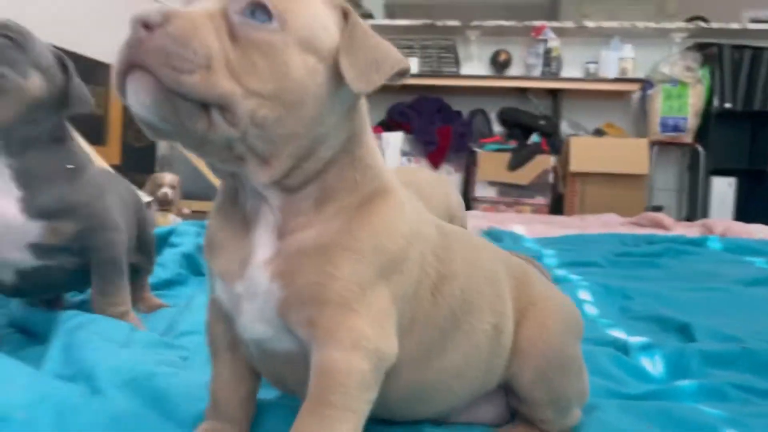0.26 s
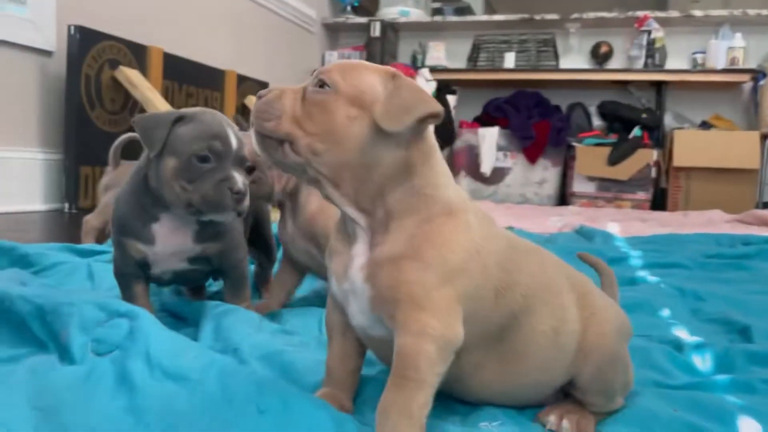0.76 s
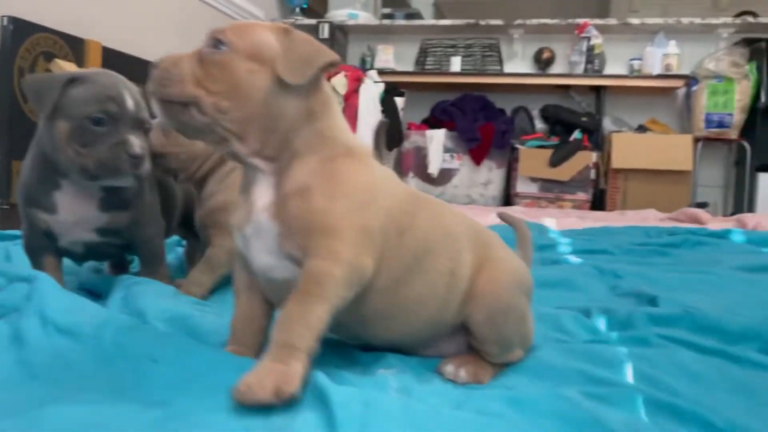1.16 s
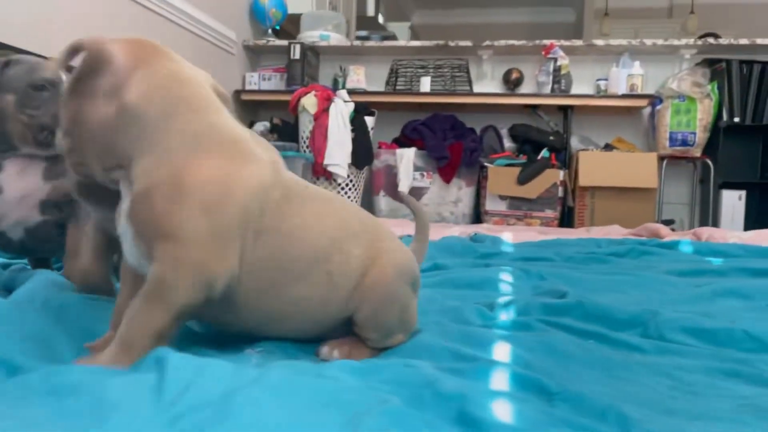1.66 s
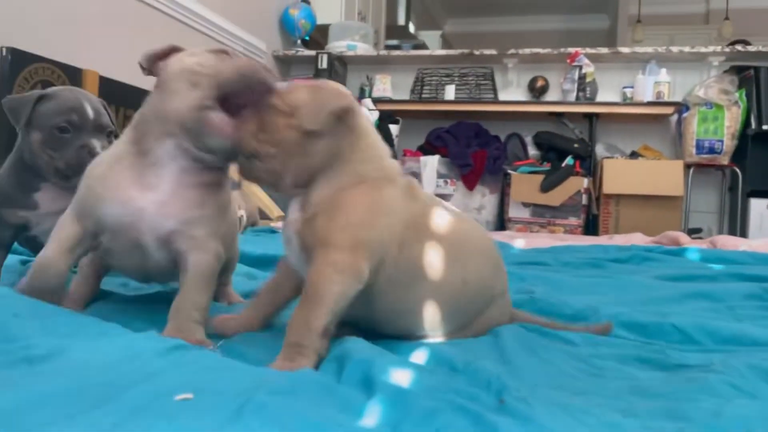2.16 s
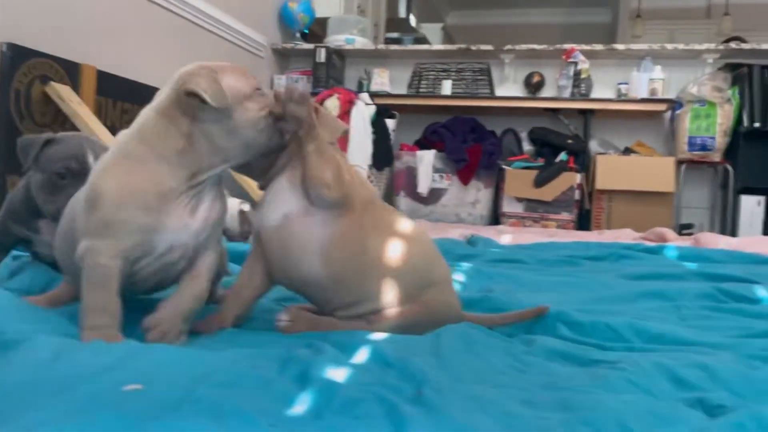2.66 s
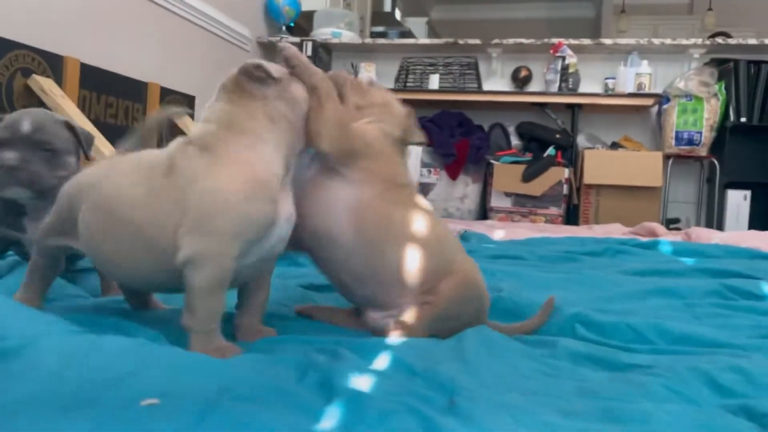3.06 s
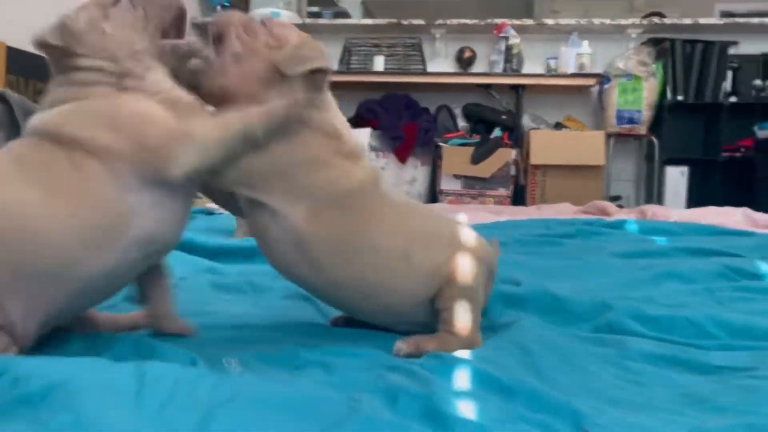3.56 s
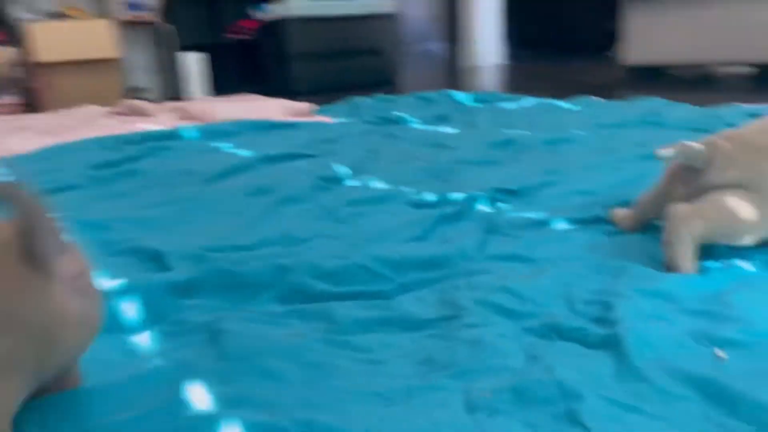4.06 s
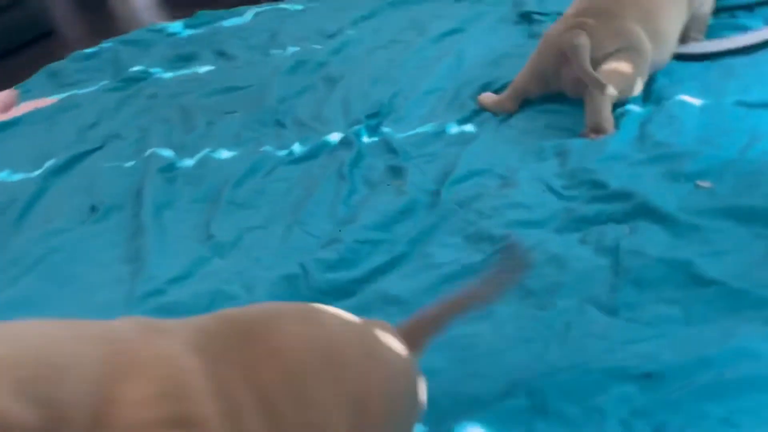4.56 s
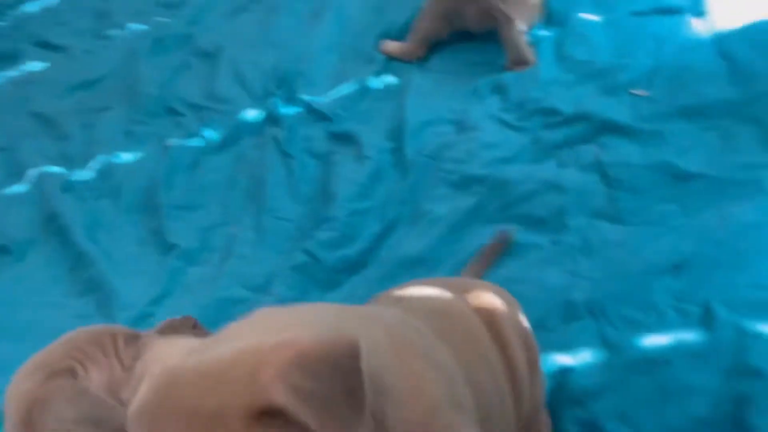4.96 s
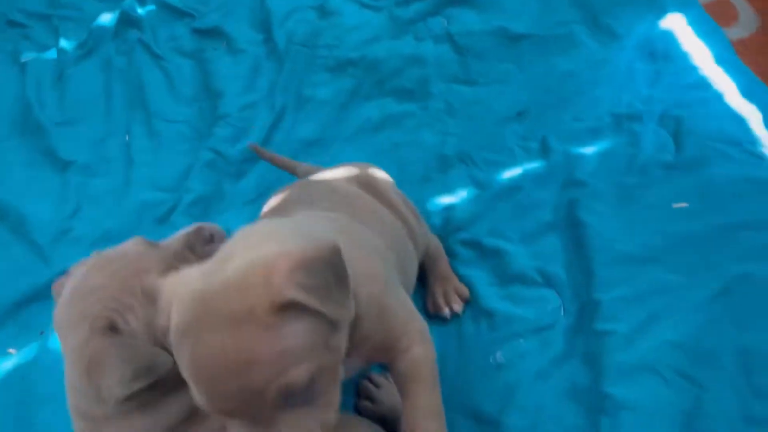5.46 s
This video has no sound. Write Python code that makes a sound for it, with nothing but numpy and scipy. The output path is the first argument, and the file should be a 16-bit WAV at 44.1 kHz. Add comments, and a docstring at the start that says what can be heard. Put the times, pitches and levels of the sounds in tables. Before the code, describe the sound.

A low, wavering machine hum near 60 Hz and a dull shuffle of paws run throughout in a small room with a short echo. From 0.2 s soft thumps, knocks and tiny cloth snaps mark paws on a blanket over a hard floor, with brushing fabric around 0.7 to 1 s and fur swishes near 0.5, 1.5 and 2.1 s. Taps cluster around 1.7 to 2.2 s. The first low puppy growl comes at 2.5 to 2.75 s, then a breathier one at 2.9 to 3.1 and a rougher one at 3.3 to 3.5. The longest, 3.7 to 4.2 s, is raspy and fluttering, with a bright tick and the strongest cloth scrape near 3.9. A sharp, yip-like growl follows at 4.55 to 4.7 s; rustling and faint bumps continue, and a short growl at 5.3 to 5.45 s precedes a last swish. Close, wide stereo.

```python
"""A wavering machine hum and soft rustling come first, soon joined by thumps and taps; growls enter later.
Puppies wrestle on a blanket over a hard floor: thumps are low decaying rings with a puff, taps short damped
rings with noisy cracks, fur and cloth make friction noise, and snaps are brief noise bursts.
The growls are source and filter: uneven vocal pulses and gated breath ring the throat resonances.
Two spaced ports hear all of it, direct and scattered, as a sum and a difference."""
import sys
import numpy as np
from scipy import signal
from scipy.fft import rfft, irfft, next_fast_len
from scipy.io import wavfile
from scipy.ndimage import uniform_filter1d, map_coordinates

SR = 44100
rng = np.random.default_rng(int(sys.argv[2]) if len(sys.argv) > 2 else 0)


def generate_wav(signal):
    """Clip the signal to [-1, 1] and save it as 16-bit WAV at the path in sys.argv[1]."""
    frames = np.transpose(np.atleast_2d(signal))
    scaled = np.clip(frames, -1, 1) * 32767
    pcm = np.round(scaled).astype(np.int16)
    wavfile.write(sys.argv[1], SR, pcm)


N = 251811


def amp(db):
    """Level to gain: 20 dB is a factor of ten in amplitude."""
    return 10 ** (np.asarray(db) / 20)


def unit(x):
    """Normalization of x to rms 1."""
    return x / np.sqrt(np.mean(x ** 2) + 1e-20)


def along(points, hz):
    """Linear interpolation of (frequency [Hz], value, ...) points on a logarithmic frequency axis."""
    f, *columns = np.transpose(points)
    return np.squeeze([np.interp(np.log(hz + 1), np.log(f + 1), c) for c in columns])


def curves(rows):
    """Linear interpolation in time: one value per sample for each column after the time."""
    s, *columns = np.transpose(rows)
    return [np.interp(np.arange(N) / SR, s, c) for c in columns]


def wobble(rate):
    """Band-limited random modulation: a smooth curve through random knots, rate of them a second."""
    knots = rng.standard_normal(int(N * rate / SR) + 4)
    return map_coordinates(knots, [np.arange(N) * rate / SR])


def filtered(x, response):
    """Linear filtering: the spectrum of x times a complex response of frequency."""
    m = next_fast_len(len(x) + 8192)
    return irfft(rfft(x, m) * response(np.fft.rfftfreq(m, 1 / SR)), m)[..., :len(x)]


def modes(table):
    """Superposed second-order resonances (frequency [Hz], width [Hz], level [dB]) of alternating sign."""
    def response(f):
        total = 0
        for k, (center, width, db) in enumerate(table):
            resonance = 1j * f * width / (center * center - f * f + 1j * f * width)
            total = total + (-1) ** k * amp(db) * resonance
        return total
    return response


def rush(spectrum, patchy_db, grain_db):
    """Friction noise of rms 1: random gain patches in time and frequency, a fast flicker, then a spectrum."""
    z = signal.stft(rng.standard_normal(N), nperseg=512)[2]
    field = uniform_filter1d(uniform_filter1d(rng.standard_normal(z.shape), 8, 0), 8, 1)
    patchy = signal.istft(z * amp(patchy_db * unit(field)), nperseg=512)[1][:N]
    grainy = patchy * amp(grain_db * wobble(400))
    return unit(filtered(grainy, lambda hz: amp(along(spectrum, hz))))


def room():
    """Continuous background of changing level: hum tones and resonant noise under a dull shuffle of many paws."""
    # background levels: (time [s], hum [dB], low shuffle [dB])
    background = [(0, -51.5, -46.5), (.38, -45, -55), (.6, -46, -56), (1, -50.5, -53), (1.43, -46, -50),
                  (1.9, -47, -52.5), (2.35, -47.5, -52), (2.64, -53, -43.5), (2.81, -50, -52),
                  (3.12, -45.5, -47), (3.26, -45, -53), (3.39, -59, -37), (3.51, -45, -52.5),
                  (3.9, -55.5, -43.5), (4.26, -47, -54), (4.61, -50, -48.5), (5.06, -52, -55),
                  (5.34, -49.5, -53), (5.71, -56, -50)]
    # wavering tones: (frequency [Hz], level re hum [dB], depth of waver [dB])
    tones = [(59.3, 0, 1.8), (119, -5, 3)]
    # room resonances under the hum: (frequency [Hz], width [Hz], level [dB])
    resonances = [(77, 19.2, 5.5), (159.5, 11, -7), (191, 12, -3.5)]
    # shape of the shuffle's spectrum: (frequency [Hz], density [dB per Hz])
    shuffle_spectrum = [(18, -49), (30, -19.5), (48, 1), (70, 3), (92, -5.5), (123, -3.5), (223, -19),
                        (395, -17), (668, -24), (7000, -68), (9100, -78), (15400, -120)]
    hum_db, shuffle_db = curves(background)
    t = np.arange(N) / SR
    hum = np.zeros(N)
    for hz, db, waver_db in tones:
        level = amp(db + waver_db * wobble(14))
        hum += level * np.sin(2 * np.pi * hz * t + .7 * wobble(11))
    # the second factor cuts below about 45 Hz
    drone = unit(filtered(rng.standard_normal(N), lambda hz: modes(resonances)(hz) * hz ** 2 / (hz ** 2 + 45 ** 2)))
    shuffle = rush(shuffle_spectrum, patchy_db=1, grain_db=1.5) * amp(wobble(12))
    drone_db = -8.0
    return amp(hum_db) * (hum + amp(drone_db) * drone) + amp(shuffle_db) * shuffle


def rustle():
    """Friction of cloth on floor and fur on fur: stroke powers add, and each rises, holds and falls."""
    # strokes: (start of full level [s], rise [s], hold [s], fall [s], cloth [dB], fur [dB], sheen re fur [dB])
    strokes = [(0.059, 0.13, .01, 0.41, -65, -94, -2), (0.227, 0.22, 0.19, 0.13, -62, -72, 8),
               (0.51, 0.038, 0.057, 0.088, -66, -55.5, -7), (0.717, 0.097, 0.23, 0.18, -58, -70, -5),
               (1.056, 0.081, 0.054, 0.61, -63, -62.5, -8), (1.316, .2, 0.023, 0.27, -64.5, -66.5, -4),
               (1.537, 0.025, 0.054, 0.085, -64.5, -53.5, -2), (1.893, 0.22, 0.0082, 0.16, -64.5, -66.5, 1),
               (2.076, 0.082, 0.053, 0.17, -60.5, -54, -5), (2.65, 0.22, .02, 0.21, -71, -66, -5.5),
               (2.888, 0.16, 0.022, 0.28, -70.5, -73, -2), (3.093, 0.2, 0.13, 0.21, -68.5, -68, -3),
               (3.402, 0.39, 0.17, 0.059, -68, -67, -2.5), (3.595, 0.034, 0.068, 0.19, -70, -69, 7),
               (3.742, 0.031, 0.057, 0.11, -66, -68.5, 1), (3.855, 0.043, 0.031, 0.073, -47.5, -46.5, 4.5),
               (3.914, .03, 0.0098, 0.33, -55, -62, 1), (4.185, 0.12, 0.021, 0.082, -54, -66.5, 6.5),
               (4.37, 0.68, 0.032, 0.1, -64, -68.5, 2.5), (4.462, 0.013, 0.0051, 0.027, -54.5, -54.5, -10),
               (4.536, 0.14, 0.16, 0.12, -57, -60.5, -3.5), (4.787, 0.19, 0.22, 0.29, -71, -78, 8.5),
               (5.105, 0.55, 0.042, 0.11, -62.5, -63.5, -2.5), (5.356, 0.072, 0.067, .1, -72, -62.5, -7),
               (5.459, 0.09, 0.044, 0.081, -55.5, -52, -7.5), (5.646, 0.1, 0.045, .1, -67, -65.5, 1)]
    # shape of the dragged cloth's spectrum: (frequency [Hz], density [dB per Hz])
    drag_spectrum = [(500, -10), (1200, -6), (1700, -2), (2500, -1), (3500, -4.5), (4700, -4), (5500, -12),
                     (6200, -13), (16000, -40)]
    # shape of the brushing fur's spectrum: (frequency [Hz], density [dB per Hz])
    hiss_spectrum = [(1500, 1), (3500, -4), (5500, 8.5), (8500, 9.5), (11000, 2), (13800, 10), (15000, 1.5),
                     (16000, -26)]
    fade_db = 27  # change of level over one rise or fall
    idle_cloth_db, idle_fur_db = -93.5, -80  # fidgeting between strokes
    sheen_hz = 9000  # the brighter part of the hiss lies above this
    t = np.arange(N) / SR
    power = np.ones((3, N)) * amp([[idle_cloth_db], [idle_fur_db], [idle_fur_db]]) ** 2
    for s, rise, hold, fall, cloth_db, fur_db, sheen_db in strokes:
        outside = np.maximum((s - t) / abs(rise), (t - s - hold) / abs(fall))
        shape_db = -fade_db * np.maximum(0, outside)
        power = power + amp(shape_db) ** 2 * amp([[cloth_db], [fur_db], [fur_db + sheen_db]]) ** 2
    drag = rush(drag_spectrum, patchy_db=1.2, grain_db=2)
    hiss = rush(hiss_spectrum, patchy_db=1.8, grain_db=1.3)
    sheen = filtered(hiss, lambda hz: hz > sheen_hz)
    return np.sum(np.sqrt(power) * [drag, hiss - sheen, sheen], axis=0)


def snaps():
    """Sudden release of tension: threads and claws let go with milliseconds of noise in a broad resonance."""
    # sharp cloth snaps: (time [s], initial level of the noise before its resonance [dB])
    releases = [(0.236, -38.5), (0.241, -39), (0.263, -43), (0.275, -38.5), (0.3621, -51), (3.1916, -38.5),
                (3.4247, -53), (3.4893, -42), (3.513, -45), (3.5848, -41), (3.8804, -48), (4.218, -39.5),
                (4.237, -53), (4.265, -48), (4.439, -55), (4.457, -42), (4.62, -35)]
    out, t = np.zeros(N + SR), np.arange(600) / SR
    t60 = 0.0085  # s
    for s, db in releases:
        out[round(s * SR):][:len(t)] += amp(db - 60 * t / t60) * rng.standard_normal(len(t))
    return filtered(out[:N], modes([(3950, 4200, 0.1)]))


def taps():
    """Short damped rings, each with a noisy crack of like pitch and a dull scuff."""
    # short rings: claws, jaws, small squeaks and catches of the growling voice:
    # (time [s], level [dB], ring frequency [Hz], crack re ring [dB])
    short_rings = [(0.236, -33.5, 291, -25), (0.263, -44, 594, -25), (0.397, -36.5, 298, -23),
                   (0.454, -45, 620, -16), (0.489, -42.5, 268, -6), (0.773, -49, 635, -21),
                   (0.894, -54.5, 540, 2), (1.256, -44, 540, -13), (1.698, -44.5, 630, -16),
                   (1.845, -43, 654, -24), (1.92, -42, 280, -4.5), (1.957, -36, 664, -19),
                   (1.989, -48.5, 855, -6), (2.075, -43, 640, -12), (2.088, -41.5, 550, -10),
                   (2.116, -46, 480, -2), (2.144, -43.5, 271, -7), (2.322, -56.5, 1260, 3),
                   (2.416, -48.5, 776, -8.5), (2.895, -47.5, 710, -6), (2.914, -36.5, 630, -16),
                   (3.138, -51.5, 764, 0), (3.19, -63, 1400, 12), (3.24, -45.5, 1380, -8),
                   (3.245, -43.5, 1006, -9.5), (3.485, -35.5, 579, -9), (3.584, -59, 1220, 12),
                   (3.646, -34.5, 342, -27), (3.882, -29.5, 2140, -12), (4.305, -50, 1870, 6.5),
                   (4.425, -54.5, 610, 3), (4.463, -54, 890, 7), (4.605, -43, 1040, -3)]
    ring_t60_s, damping = 0.034, 0.17  # ring at 600 Hz; higher rings die sooner by this power
    crack_t60_s = 0.1  # the ring's own decay shortens the crack further
    # dull scuff: level re crack, and (frequency [Hz], width [Hz], level [dB])
    scuff_db, scuff_t60_s, scuff_modes = -5, 0.14, [(716, 660, 0)]
    out, t = np.zeros(N + SR), np.arange(SR // 8) / SR
    for s, db, hz, crack_db in short_rings:
        start = round(s * SR)
        t60 = ring_t60_s * (600 / hz) ** damping
        ring = np.sin(2 * np.pi * hz * t) * (1 - np.exp(-t * hz / 0.45))  # soft onset
        crack_band = modes([(1.1 * hz, 1.2 * hz, 0)])
        crack = unit(filtered(rng.standard_normal(len(t)), lambda f: crack_band(f) ** 2))
        crack = crack * amp(crack_db - 60 * t / crack_t60_s)
        out[start:][:len(t)] += amp(db - 60 * t / t60) * (ring + crack)
        scuff = unit(filtered(rng.standard_normal(len(t)), modes(scuff_modes)))
        scuff = scuff * (1 - np.exp(-t / 0.0078))
        out[start:][:len(t)] += amp(db + crack_db + scuff_db - 60 * t / scuff_t60_s) * scuff
    return out[:N]


def thumps():
    """Decay of a low mode: a damped ring, rising gently, with a dull puff of noise."""
    # low thumps, some faint and of unclear cause:
    # (time [s], peak of the ring [dB], ring frequency [Hz], decay time t60 [s])
    low_rings = [(0.218, -35.5, 114, 0.017), (0.232, -34.5, 89.8, 0.16), (0.399, -30, 72.4, 0.064),
                 (0.486, -40.5, 101, 0.18), (0.601, -40.5, 109, 0.13), (0.78, -39.5, 84.6, 0.24),
                 (0.857, -36, 58, 0.2), (1.36, -37.5, 105.7, 0.13), (1.587, -38.5, 72, 0.15),
                 (1.704, -32.5, 106, 0.06), (1.777, -38.5, 69.5, 0.08), (1.921, -30.5, 110, 0.071),
                 (2.145, -39, 78.6, 0.13), (2.821, -41.5, 69.5, 0.1), (3.358, -34.5, 62, 0.2),
                 (3.677, -45, 74, 0.12), (4.316, -41, 97, 0.064), (4.496, -43.5, 133, 0.06),
                 (4.815, -40.5, 69.3, 0.22), (5.031, -39, 63, 0.082), (5.474, -36.5, 70.4, 0.03)]
    # dull puff: level re ring peak, and (frequency [Hz], width [Hz], level [dB])
    puff_db, puff_t60_s, puff_modes = -15, .09, [(270, 320, 0)]
    out, t = np.zeros(N + SR), np.arange(SR // 4) / SR
    for s, db, hz, t60 in low_rings:
        ring = np.sin(2 * np.pi * hz * t) * amp(-60 * t / t60) * (1 - np.exp(-t * hz / 0.85))
        puff = unit(filtered(rng.standard_normal(len(t)), lambda f: modes(puff_modes)(f) ** 2))
        puff = puff * amp(puff_db - 60 * t / puff_t60_s) * (1 - np.exp(-t / 0.0055))
        out[round(s * SR):][:len(t)] += amp(db) * (ring / np.abs(ring).max() + puff)
    return out[:N]


def walls(x):
    """Reverberation: convolution with a short, exponentially decaying noise tail."""
    level_db, t60_s = -8.5, 0.25
    t = np.arange(SR // 3) / SR
    tail = amp(-60 * t / t60_s) * rng.standard_normal(len(t)) * (t > .004)  # silent for the first 4 ms
    return amp(level_db) * signal.fftconvolve(x, tail / np.linalg.norm(tail))[:N]


def slapping_folds():
    """Subharmonic relaxation: loose folds slap shut at a slow beat, and the voice sags until the next slap."""
    # slapping spells: (first [s], last [s], slaps a second [1/s], sag from slap to slap [dB])
    spells = [(3.366, 3.45, 51, 7), (3.851, 4.1, 48.1, 8)]
    t, slap, sag_db = np.arange(N) / SR, np.zeros(N), np.zeros(N)
    for first, last, rate, depth_db in spells:
        beat = ((t - first) * rate % 1) * (t > first) * (t < last)
        sag_db -= depth_db * (beat - .5) * (beat > 0)
        slap[1:] += (np.diff(beat) < -.5) * amp(rng.normal(0, 1, N - 1))  # one pulse where the beat wraps
    return slap, sag_db


def throat_band(source, table, mouth_db, jaw_motion, sway):
    """Vocal-tract filtering at rms 1: resonances move between two tunings as the jaw opens."""
    # the response is squared: each resonance acts twice, doubling its dB
    low, high = (filtered(source, lambda hz: modes(table)(hz * k) ** 2) for k in (1 + sway, 1 - sway))
    opening = unit(mouth_db - mouth_db.mean()) + jaw_motion  # with effort, and at random
    turn = np.pi / 4 * (1 + np.tanh(opening))
    return unit(np.cos(turn) * low + np.sin(turn) * high)


def growls():
    """Source-filter phonation: uneven vocal pulses and gated breath ring chest, mouth and back of the throat."""
    # one table a growl: (time [s], pitch before jitter [Hz], chest level [dB])
    pitch_tables = [
        [(2.5, 117, -73), (2.534, 127.9, -50.5), (2.57, 118.4, -47.5), (2.662, 123.4, -51), (2.7, 135.6, -44.5),
         (2.75, 134, -77)],
        [(2.89, 135.4, -64), (2.925, 150.3, -50.5), (2.95, 151.9, -45.5), (2.986, 141.6, -68),
         (3.014, 133.7, -60), (3.044, 124.3, -51), (3.064, 117.4, -49.5), (3.11, 135, -64)],
        [(3.28, 134, -80), (3.314, 131.6, -54), (3.402, 145.6, -48), (3.424, 145.3, -54), (3.478, 139.3, -49),
         (3.496, 139.5, -38.5), (3.54, 139, -64)],
        [(3.7, 161.3, -63), (3.716, 157.5, -53), (3.776, 138.3, -48.5), (3.83, 142, -48.5),
         (3.91, 147.6, -62.5), (3.97, 145.1, -54), (4.02, 141.7, -55), (4.046, 149.1, -63), (4.115, 153.2, -49),
         (4.142, 130.4, -52), (4.2, 124.3, -68)],
        [(4.53, 134.6, -80), (4.55, 142.7, -45), (4.59, 147, -50.5), (4.615, 168.5, -41.5),
         (4.642, 155.2, -38.5), (4.668, 138, -47), (4.69, 128, -65)],
        [(5.3, 163.9, -69), (5.322, 164.6, -41), (5.345, 157.2, -44), (5.368, 165.6, -44.5),
         (5.39, 152.8, -44.5), (5.424, 150.5, -45.5), (5.445, 150, -65)],
    ]
    # one table a growl: (time [s], mouth level [dB], open jaw level [dB], rasp level [dB])
    snarl_tables = [
        [(2.5, -67, -82, -95), (2.526, -59, -80, -90), (2.552, -51.5, -77, -91), (2.57, -54, -79, -80),
         (2.596, -55, -78, -83), (2.622, -48.5, -62, -63), (2.638, -52.5, -65, -73), (2.7, -46.5, -63.5, -66),
         (2.72, -55, -74, -75), (2.735, -72, -84, -95)],
        [(2.89, -55, -85, -79), (2.908, -61, -80, -81), (2.917, -46, -68, -70), (2.946, -46, -63, -65),
         (2.966, -61, -74, -75), (2.974, -61, -69, -73), (2.984, -57, -72, -73), (3.014, -46.5, -65, -65.5),
         (3.07, -46, -65, -65), (3.11, -69, -76, -74)],
        [(3.28, -66, -76, -77), (3.286, -68, -85, -77), (3.324, -49.5, -64, -70), (3.362, -62, -68, -75),
         (3.368, -46.5, -67, -71), (3.398, -46, -58, -61), (3.416, -50.5, -61, -66), (3.478, -55, -73, -66),
         (3.496, -48.5, -58, -71), (3.54, -77, -69, -68)],
        [(3.7, -73, -88, -91), (3.714, -48, -79, -69), (3.756, -44.5, -58, -57.5), (3.836, -46, -62, -57),
         (3.888, -52, -64, -49.5), (3.908, -53.5, -63, -60.5), (4.062, -51, -63, -57.5),
         (4.086, -53.5, -76, -59), (4.162, -66.5, -72, -72), (4.2, -53, -67, -68)],
        [(4.53, -65, -79, -69), (4.536, -70, -79, -73), (4.558, -53, -61, -65), (4.588, -50, -63, -71),
         (4.596, -56, -72, -72), (4.608, -42.5, -52, -55), (4.664, -47, -58.5, -60.5), (4.69, -72, -75, -69)],
        [(5.3, -69, -91, -95), (5.31, -63, -75, -78), (5.318, -46.5, -74, -65), (5.33, -48.5, -76, -68),
         (5.368, -53.5, -71, -70), (5.382, -52, -70, -83), (5.39, -54, -74, -73), (5.404, -45, -66, -72),
         (5.426, -64, -82, -78), (5.445, -71, -75, -76)],
    ]
    # In the resonances below, each level is that of one of two passes.
    # one row a growl: (chest [Hz], its width [Hz], mouth [Hz], its width [Hz], mouth level [dB])
    throats = [(248, 88, 766, 200, 4), (268, 210, 776, 230, 5.5), (244, 194, 730, 140, 6.5),
               (274, 150, 722, 180, 5), (227, 130, 955, 160, 1.5), (163, 106, 780, 210, 10)]
    # one row a growl: (rasp frequency [Hz], its width [Hz], level [dB])
    rasps = [(2300, 330, 1), (2350, 550, -1), (2300, 500, 4), (2220, 230, 5), (2360, 450, 8),
             (2050, 400, 6)]
    # one row a growl: (pitch jitter [0-1], basic breath share [0-1], flutter depth [dB],
    # strong-weak alternation of closures [dB])
    folds = [(.018, .2, 1.2, 0), (.07, .48, 2, 2), (.075, .46, 2.5, 2.5), (.085, .4, 2.5, 2.5),
             (.05, .28, 1.5, 1.5), (.035, .25, 1.5, 1)]
    # lower mouth resonance: (frequency [Hz], width [Hz], level [dB])
    tongue = (337, 350, 0.81)
    # open jaw resonances: (frequency [Hz], width [Hz], level [dB])
    jaw = [(983, 780, 5), (1510, 510, 6.5)]
    # back of the throat: (frequency [Hz], width [Hz], level [dB])
    gullet = (1650, 330, 0)
    sway, sways_per_s = .06, 14  # share by which resonances shift each way; knots of random jaw motion
    out = np.zeros(N)
    slap, sag_db = slapping_folds()
    for rows, snarl, throat, rasp, fold in zip(pitch_tables, snarl_tables, throats, rasps, folds):
        chest_hz, chest_width, mouth_hz, mouth_width, lift_db = throat
        jitter, breath, flutter_db, pair_db = fold
        a, b = int(rows[0][0] * SR), int(rows[-1][0] * SR)
        pitch, chest_db, mouth_db, jaw_db, rasp_db = (c[a:b] for c in curves(rows) + curves(snarl))
        cycles = np.cumsum(pitch * np.exp(jitter * wobble(90)[a:b])) / SR
        closing = (1 + np.cos(2 * np.pi * cycles)) / 2
        strength_db = flutter_db * np.tanh(wobble(130)[a:b])
        strength_db += pair_db * np.cos(np.pi * cycles)  # every second closure is weaker
        pulses = unit(closing ** 400 * amp(strength_db)) + 30 * slap[a:b]
        puffs = closing ** 0.5 * rng.standard_normal(b - a)  # breath puffs once a cycle
        air = unit(filtered(puffs, lambda hz: hz < 3200))
        # loose folds flap the growl into lumps
        flap = amp(flutter_db * np.tanh(wobble(60)[a:b]) + sag_db[a:b])

        def band(table, share, shift):
            """Mixing of pulses and breath by power share, then resonance."""
            share = np.clip(share, 0, 1)
            source = (np.sqrt(1 - share) * pulses + np.sqrt(share) * air) * flap
            return throat_band(source, table, mouth_db, wobble(sways_per_s)[a:b], shift)

        voice = amp(chest_db) * band([(chest_hz, chest_width, 0)], breath * 1.2, sway / 2)
        voice += amp(mouth_db) * band([tongue, (mouth_hz, mouth_width, lift_db)], breath, sway)
        voice += amp(jaw_db) * band(jaw, breath + .1, sway)
        voice += amp(rasp_db) * band([gullet, rasp], breath + .15, sway / 2)  # breathier than the mouth
        out[a:b] += voice * signal.windows.tukey(b - a, .04)
    return out + walls(out)


def ports(part):
    """Sum and difference of two ports: the sum nearly vanishes near 8.6 kHz; the difference is part tied to it."""
    # port pair: (frequency [Hz], sum [dB], difference [dB], phase of difference [rad],
    # share of the difference tied to the sum [0-1])
    pair = [(70.4, -1.5, -21, 3, 0.1), (234, 4, -6, 1.44, 0.86), (593, -1.5, -1, 1.37, 0.82),
            (1015, -3, -2.5, 1.14, 0.6), (2200, -5.5, -8, -0.15, 0.25), (4180, -9, -10.5, 0.6, 0.6),
            (4950, -6, -11, -0.1, 0.4), (7120, -8, -7, -2, 0), (8120, -19.5, -3.5, 2, 1),
            (8620, -40.5, 0, 9, 0), (9815, -4, 1, 6.5, 0), (11150, 1, 3, 0.5, 0.4),
            (11600, 0.5, -1, 3.5, 0.9), (13500, 1, -33, -1, 0.2)]

    def response(hz):
        sum_db, diff_db, phase, tied = along(pair, hz)
        tied = np.clip(tied, 0, 1)
        tied_part = amp(diff_db) * tied * np.exp(1j * phase)
        loose_part = amp(diff_db) * np.sqrt(1 - tied ** 2)
        return (amp(sum_db), tied_part, loose_part)[part]
    return response


def scene():
    """Superposition of direct sound and sound scattered along ever-changing paths, at two spaced ports."""
    voices, rest = growls(), thumps() + taps() + snaps() + rustle() + room()
    facing_db = -1.5  # the growlers stand ahead of the ports: less of them in the difference
    aside = amp(facing_db) * voices + rest
    z = signal.stft(aside, nperseg=1024)[2]
    paths = uniform_filter1d(uniform_filter1d(rng.standard_normal(z.shape), size=5, axis=0), size=3, axis=1)
    # floor and walls scatter: random phases, smooth in time and frequency
    scattered = signal.istft(z * np.exp(2j * unit(paths)), nperseg=1024)[1][:N]
    scattered_db = 2.0
    mid = filtered(voices + rest, ports(part=0))
    side = filtered(aside, ports(part=1)) + amp(scattered_db) * filtered(scattered, ports(part=2))
    return np.array([mid + side, mid - side])


def record(dry):
    """Band limitation: nothing passes at or above the top frequency."""
    top_hz = 15805
    return np.array([filtered(x, lambda hz: hz < top_hz) for x in dry])


dry = scene()
out = record(dry)
generate_wav(out)
```